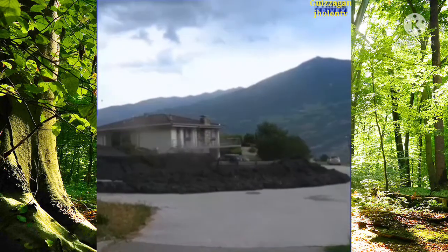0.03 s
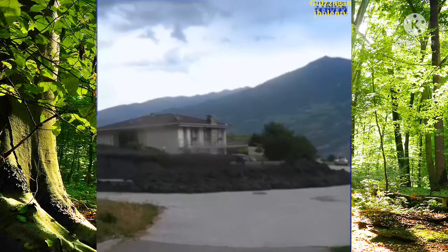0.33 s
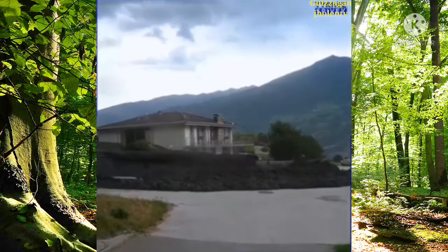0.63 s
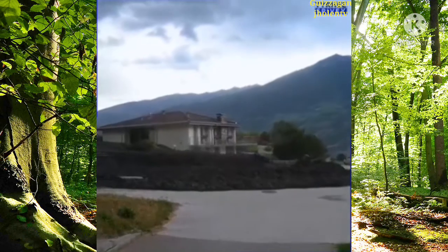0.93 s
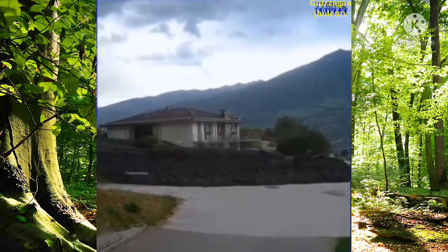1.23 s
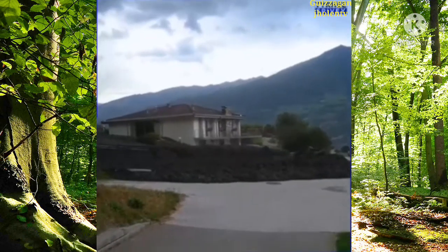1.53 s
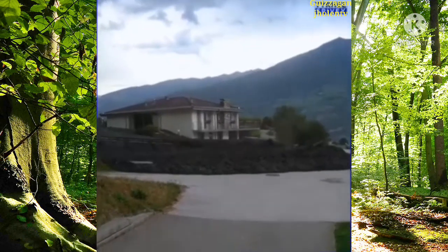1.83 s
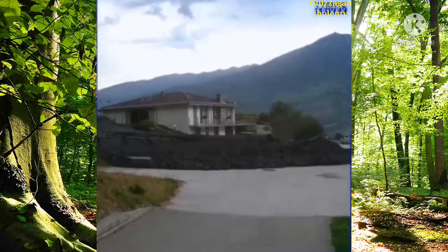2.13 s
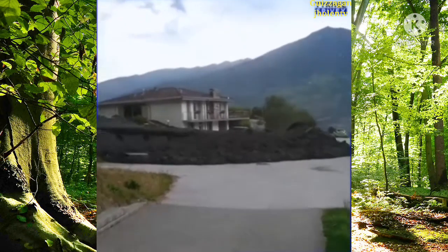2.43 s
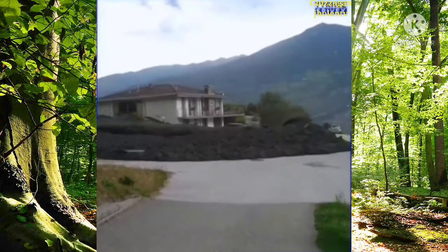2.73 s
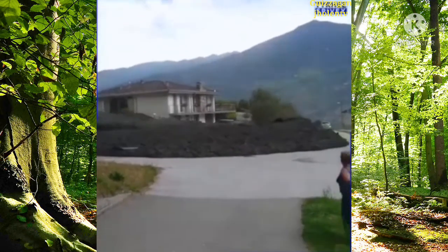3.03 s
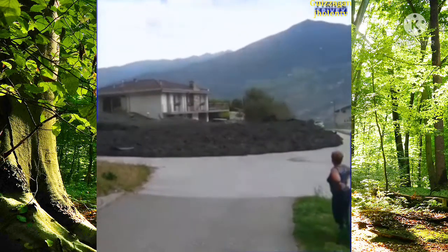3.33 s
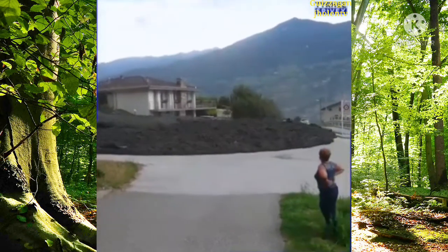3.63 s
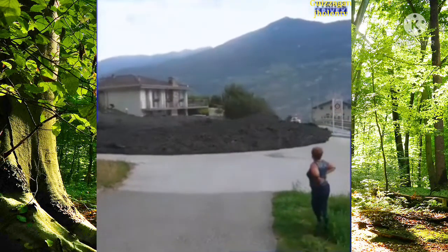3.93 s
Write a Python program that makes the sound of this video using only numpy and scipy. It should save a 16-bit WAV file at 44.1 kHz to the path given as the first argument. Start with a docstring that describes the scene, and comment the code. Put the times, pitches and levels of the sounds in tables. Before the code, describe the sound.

A mudslide begins as a faint hiss over a low rumble. From about 1.5 seconds it swells into a wet roar with rattling stones, and large pieces grind from 2.5 seconds. Near 3 seconds debris crashes with a thin, high ring and the microphone cracks twice from overload. Smaller breaks follow as the roar continues. Wind buffets the microphone briefly around 2 seconds and hardest in the last second.

```python
"""A mudslide rolls past a house. It starts as a distant hiss over a low rumble; the mass swells,
wet mud rushes, stones rattle in it and large pieces grind. At the height of the surge, near 3 s,
something breaks with a crash and a thin ring, and the microphone cracks twice from overload.
Wind buffets the microphone, hardest in the last second."""
import sys
import numpy as np
from scipy import signal
from scipy.fft import rfft, irfft
from scipy.io import wavfile
from scipy.ndimage import uniform_filter1d, map_coordinates

SR = 44100
rng = np.random.default_rng(int(sys.argv[2]) if len(sys.argv) > 2 else 0)


def wav_record(signal):
    """Record a signal, one row per channel, as 16-bit PCM in the file named by sys.argv[1]."""
    frames = np.transpose(np.atleast_2d(signal))
    bounded = np.clip(frames, -1, 1)
    # unit amplitude maps onto the largest positive 16-bit level
    quanta = np.round(bounded * 32767).astype(np.int16)
    wavfile.write(sys.argv[1], SR, quanta)


N = 176400
TIME_S = np.arange(N) / SR

# moving mass [t/s, level/dB]
RUMBLE_LEVELS = [(0, -43.5), (.2, -44.5), (.55, -41), (.64, -37.5), (.85, -39.5), (1.13, -36.5),
                 (1.34, -35.5), (1.45, -40), (1.73, -24), (1.88, -25), (2.06, -20), (2.28, -19.5),
                 (2.4, -17.5), (2.86, -16), (3.01, -10), (3.15, -15.5), (3.86, -13), (4, -19.5)]
# mass spectra, far and near [f/Hz, relative level/dB]
RUMBLE_FAR_SPECTRUM = [(40, -24), (60, -6.5), (95, 3), (140, -0.5), (200, -2.5), (310, -6), (380, -12),
                       (460, -20), (560, -31)]
RUMBLE_NEAR_SPECTRUM = [(40, -24.5), (58, -0.5), (85, -1), (135, -1), (200, -5.5), (260, -10.5),
                        (340, -9.5), (420, -15.5), (520, -26.5), (800, -47.5)]
# rushing mud [t/s, relative body level/dB, relative grit level/dB]
MUD_LEVELS = [(0, -53.5, -60), (.2, -55, -62.5), (.68, -52.5, -60), (1.38, -50, -56.5),
              (1.62, -42.5, -48.5), (1.76, -37, -44), (1.98, -37, -42.5), (2.14, -32.5, -41),
              (2.44, -31, -37), (2.62, -24, -30.5), (2.79, -24.5, -31), (2.93, -21, -30), (3.13, -21, -29),
              (3.42, -22, -36), (3.77, -24.5, -37), (3.83, -21.5, -34.5), (4, -26, -41.5)]
# mud spectra: far body, near body, grit [f/Hz, relative level/dB]
MUD_FAR_SPECTRUM = [(200, -14), (520, -7.5), (800, -4.5), (1250, -1), (1700, -2.5), (2400, 0), (3000, -3.5),
                    (3800, -11.5), (5000, -27)]
MUD_NEAR_SPECTRUM = [(200, -5), (450, 3), (600, 0.5), (1000, 1), (1400, -1.5), (2200, -5), (3000, -10),
                     (3800, -15), (5000, -45)]
GRIT_SPECTRUM = [(2000, -16), (3000, 0), (3700, 0.5), (4400, -1), (5100, -8), (6000, -15), (6700, -23),
                 (7100, -57.5), (7600, -77.5)]
# wind on the microphone [t/s, level/dB]
WIND_LEVELS = [(0, -68), (.9, -69), (1.13, -38), (1.26, -61), (1.56, -55), (1.76, -40), (1.91, -23),
               (2.09, -35), (2.22, -30), (2.45, -35.5), (2.8, -26.5), (2.98, -17), (3.1, -11.5), (3.4, -14),
               (3.72, -16), (4, -17)]
# wind spectrum [f/Hz, relative level/dB]
WIND_SPECTRUM = [(12, -32), (24, -11), (33, -2), (48, 3), (70, -4.5), (110, -9), (170, -15.5), (260, -34.5)]
# grinding pieces, plus one low thud (the 410 Hz row) [peak t/s, half-length/s, resonance f/Hz, bandwidth/Hz,
# level/dB]
GRINDS = [(2.565, 0.21, 1140, 300, -30), (3.005, 0.058, 410, 50, -20), (3.0, 0.15, 900, 240, -23),
          (3.2, 0.24, 2250, 420, -30.5)]
# breaking debris [t/s, level/dB, decay/s]
CRASH_BURSTS = [(2.952, -15, 0.024), (3.003, -24.5, 0.02), (3.051, -22, 0.016), (3.19, -30.5, .025),
                (3.375, -26.5, .025), (3.595, -26.5, .025)]
# crash spectrum [f/Hz, relative level/dB]
CRASH_SPECTRUM = [(200, -12), (400, 1.5), (900, -7), (1800, 1.5), (3000, -0.5), (4400, -6.5), (6000, -17.5),
                  (6800, -33.5), (7300, -72)]
# ringing debris [t/s, level/dB]
RING_STRIKES = [(2.977, -32.5), (3.048, -34.5), (3.145, -39)]
# overload cracks [t/s, span of flips/s, polarity, flip count, mean flip length/s]
OVERLOAD_CRACKS = [(2.9609, .0003, -1, 1, .000045), (3.0384, .0012, 1, 5, .00007)]

APPROACH_SPAN_S = (0.61, 2.63)
STONES_PER_S, STONE_SPREAD_DB, STONE_POWER_SHARE = 900, 2.5, 0.27
PATCH_HZ, PATCH_S, PATCH_DB = 59.9, 0.09, 2.5
IMPACT_ATTACK_S, IMPACT_HOLD_S = 0.002, 0.023
RING_HZ, RING_WAVER_HZ, RING_DECAY_S = 4508, 16, 0.076
MIC_CUTOFF_HZ, OUTPUT_CUTOFF_HZ = 6900, 16000


def undb(db):
    """Decibels to gain."""
    return 10 ** (np.asarray(db) / 20)


def unit(x):
    """Scale to rms 1."""
    return x / np.sqrt(np.mean(x ** 2))


def noise():
    """White noise."""
    return rng.standard_normal(N)


def envelope(table, column=1):
    """Gain over time from one dB column."""
    rows = np.array(table)
    return undb(np.interp(TIME_S, rows[:, 0], rows[:, column]))


def colour(x, spectrum, skirt_db_per_octave=40):
    """Shape x by a spectrum, rolling off past both ends; rms 1."""
    hz, db = np.array(spectrum).T
    octave = np.log2(np.maximum(np.arange(N // 2 + 1) * SR / N, 1))
    knots = np.log2(hz)
    octaves_outside = np.abs(octave - np.clip(octave, knots[0], knots[-1]))
    gain = undb(np.interp(octave, knots, db) - skirt_db_per_octave * octaves_outside)
    return unit(irfft(rfft(x) * gain, N))


def wander(rate_hz):
    """Random steps, smoothed twice; rms 1."""
    hold = max(int(SR / rate_hz), 1)
    steps = np.repeat(noise()[:N // hold + 1], hold)
    return unit(uniform_filter1d(uniform_filter1d(steps, hold), hold)[:N])


def flutter(rate_hz, depth_db):
    """Unevenly swelling gain."""
    return undb(depth_db * wander(rate_hz))


def approach(x, far, near):
    """Crossfade from the far spectrum to the near one."""
    nearness = np.interp(TIME_S, APPROACH_SPAN_S, [0, 1])
    return (1 - nearness) * colour(x, far) + nearness * colour(x, near)


def mass_rumble():
    """The heavy mass tumbles along the ground."""
    rumble = approach(noise(), RUMBLE_FAR_SPECTRUM, RUMBLE_NEAR_SPECTRUM)
    return rumble * envelope(RUMBLE_LEVELS) * flutter(rate_hz=22, depth_db=1.0)


def slurry():
    """Smooth flow plus dense stone clicks of unequal size."""
    clicks = (rng.random(N) < STONES_PER_S / SR) * np.sign(noise())
    sizes = undb(STONE_SPREAD_DB * np.minimum(rng.exponential(size=N), 5))
    return np.sqrt(STONE_POWER_SHARE) * unit(clicks * sizes) + np.sqrt(1 - STONE_POWER_SHARE) * noise()


def churn(x, frame=2048, hop=512):
    """The flow churns: brief resonances come and go at random."""
    _, _, cells = signal.stft(x, nperseg=frame, noverlap=frame - hop)
    bins, frames = np.indices(cells.shape)
    position = [bins * SR / frame / PATCH_HZ, frames * hop / SR / PATCH_S]
    patches = map_coordinates(rng.standard_normal((1024, 256)), position, order=3, mode="mirror")
    _, churned = signal.istft(cells * undb(PATCH_DB * patches), nperseg=frame, noverlap=frame - hop)
    return unit(churned[:N])


def mud_rush():
    """Mud and stones: thin hiss far off, full roar close by, gritty treble on top."""
    body = approach(churn(slurry()), MUD_FAR_SPECTRUM, MUD_NEAR_SPECTRUM)
    body *= envelope(MUD_LEVELS) * undb(1.5)
    grit = colour(churn(slurry()), GRIT_SPECTRUM)
    grit *= envelope(MUD_LEVELS, column=2) * undb(0.02)
    return (body + grit) * flutter(rate_hz=25, depth_db=0.79)


def wind():
    """Deep buffeting at the microphone."""
    return colour(noise(), WIND_SPECTRUM) * envelope(WIND_LEVELS)


def grinding():
    """Large pieces grind past each other, each swelling and fading in one resonance; the short, low 410 Hz
    swell near 3 s is a thud."""
    out = np.zeros(N)
    for peak_s, half_s, hz, width_hz, db in GRINDS:
        resonance = signal.butter(2, [hz - width_hz / 2, hz + width_hz / 2], "bandpass", fs=SR, output="sos")
        swell = np.cos(np.pi / 2 * np.clip((TIME_S - peak_s) / half_s, -1, 1)) ** 2
        out += undb(db) * swell * unit(signal.sosfilt(resonance, slurry()))
    return out


def impact(start_s, decay_s):
    """Envelope: quick attack, short hold, exponential fall."""
    age_s = np.maximum(TIME_S - start_s, 0)
    attack = 1 - np.exp(-age_s / IMPACT_ATTACK_S)
    return attack * np.exp(-np.maximum(age_s - IMPACT_HOLD_S, 0) / decay_s)


def crash():
    """Debris splinters in bursts of noise."""
    bursts = sum(undb(db) * impact(start_s, decay_s) for start_s, db, decay_s in CRASH_BURSTS)
    return colour(noise(), CRASH_SPECTRUM) * bursts


def ring():
    """Hard debris, struck, rings with one thin wavering tone."""
    pitch_hz = RING_HZ + RING_WAVER_HZ * wander(rate_hz=150)
    tone = unit(np.sin(2 * np.pi * np.cumsum(pitch_hz) / SR))
    strikes = sum(undb(db) * impact(start_s, RING_DECAY_S) for start_s, db in RING_STRIKES)
    return tone * flutter(rate_hz=40, depth_db=2.0) * strikes


def overload(x, rail=0.9):
    """At set times the signal sticks near full scale and briefly flips sign."""
    for start_s, span_s, polarity, count, flip_s in OVERLOAD_CRACKS:
        stuck = np.clip(2 - np.abs(TIME_S - start_s - span_s / 2) / span_s, 0, 1)
        centres_s = start_s + span_s * (np.arange(count) + rng.random(count)) / count
        stretch = rng.uniform(.4, 1.6, count)
        widths_s = flip_s * stretch / stretch.mean()
        flipped = (np.abs(TIME_S[:, None] - centres_s) < widths_s / 2).any(axis=1)
        x = x * (1 - stuck) + stuck * polarity * rail * (1 - 2 * flipped)
    return x


def scene():
    """All sources, mono."""
    return (mass_rumble() + mud_rush() + wind() + crash() + ring() + grinding())[None]


def record(dry):
    """A dull microphone rounds the peaks and cracks from overload."""
    mic_lowpass = signal.ellip(8, .05, 60, MIC_CUTOFF_HZ, fs=SR, output="sos")
    output_lowpass = signal.ellip(8, .2, 70, OUTPUT_CUTOFF_HZ, fs=SR, output="sos")
    rounded = dry[0] / (1 + dry[0] ** 6) ** (1 / 6)
    dull = signal.sosfiltfilt(mic_lowpass, rounded)
    return signal.sosfilt(output_lowpass, overload(dull))[None]


dry = scene()
out = record(dry)
wav_record(out)
```